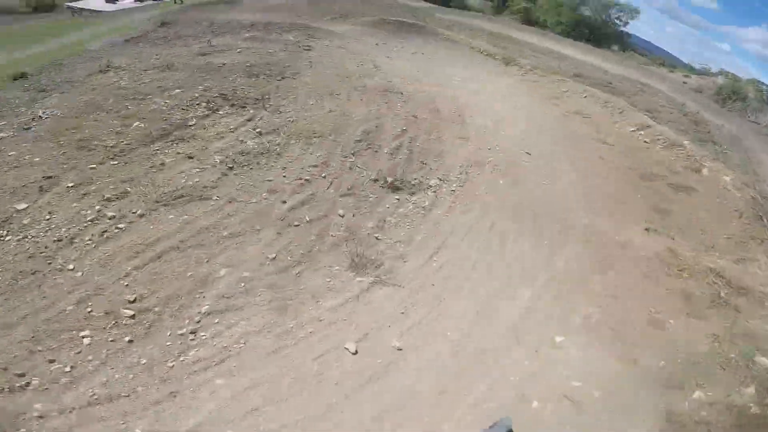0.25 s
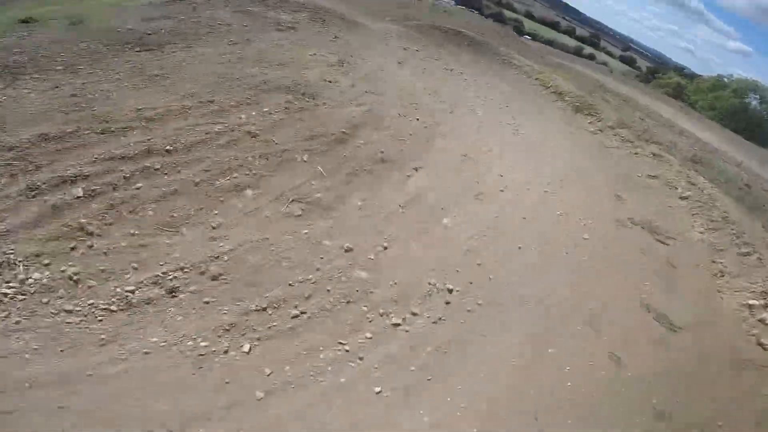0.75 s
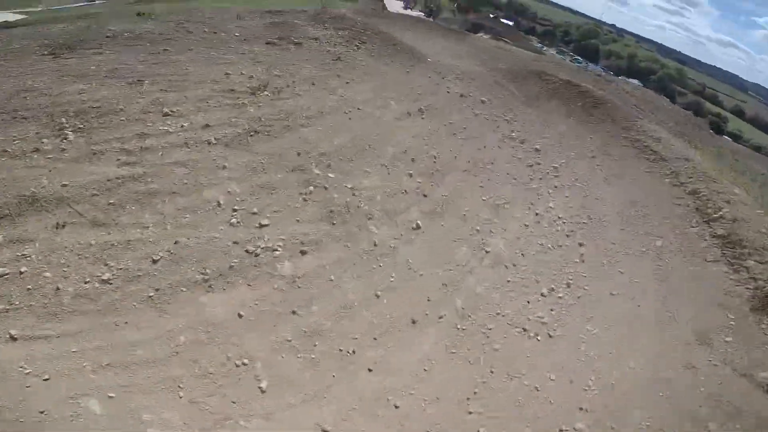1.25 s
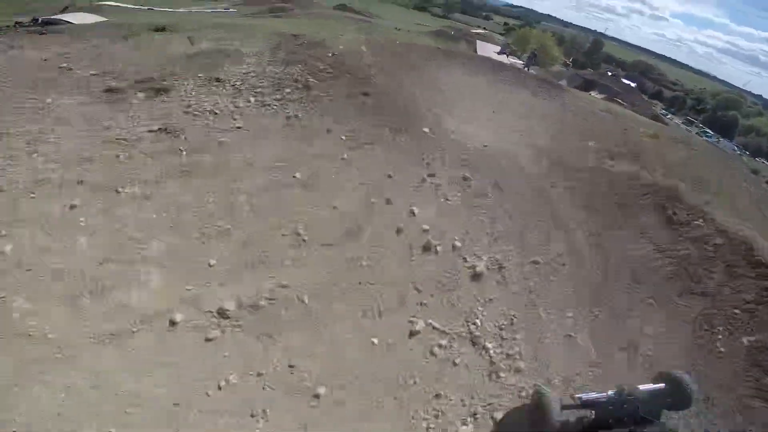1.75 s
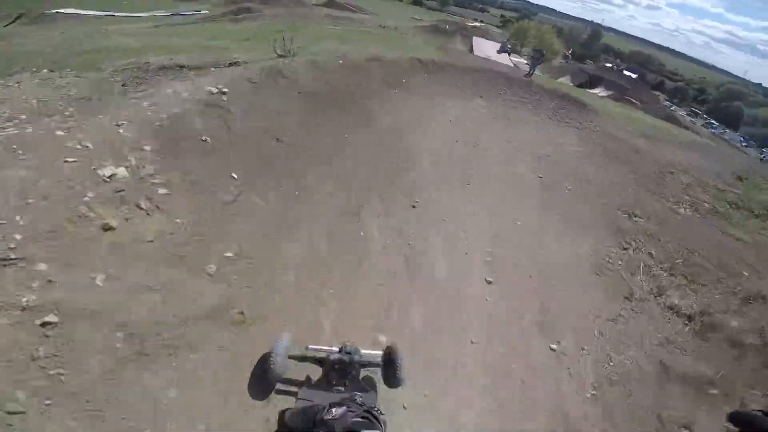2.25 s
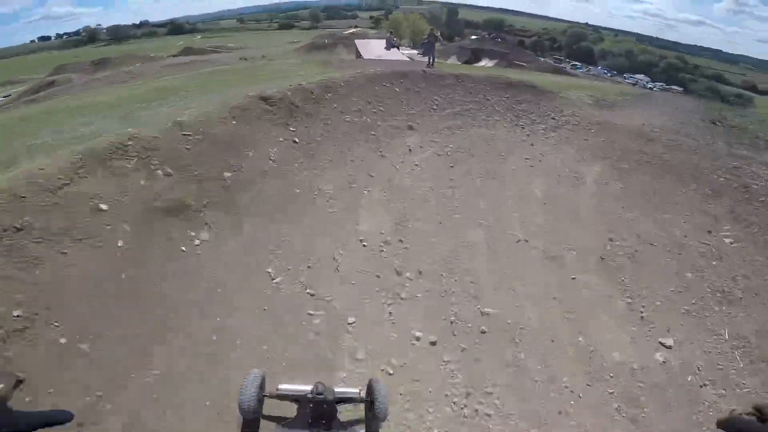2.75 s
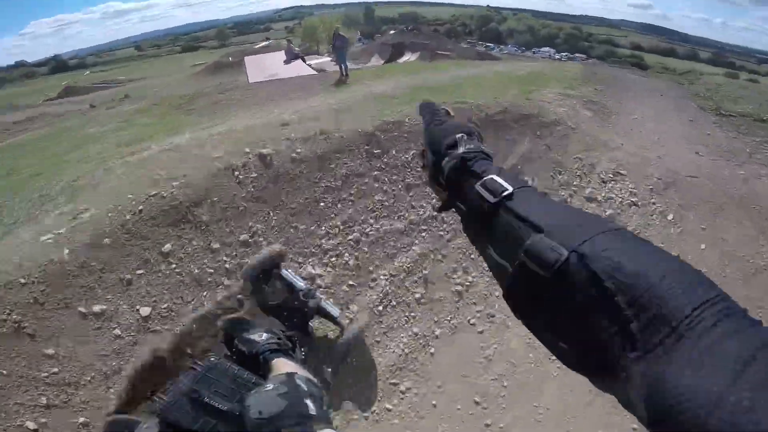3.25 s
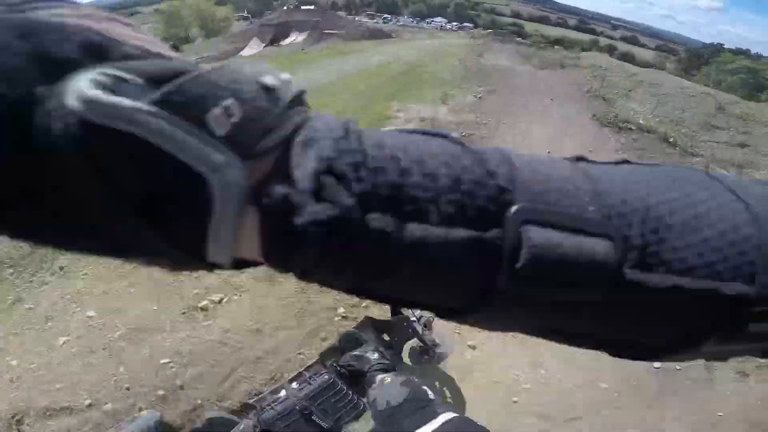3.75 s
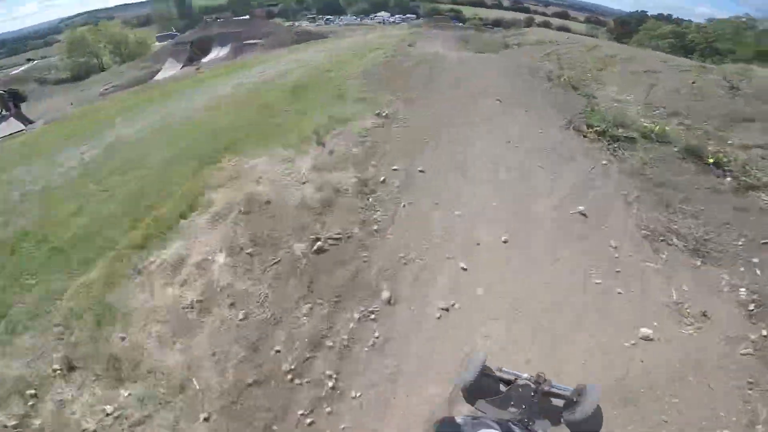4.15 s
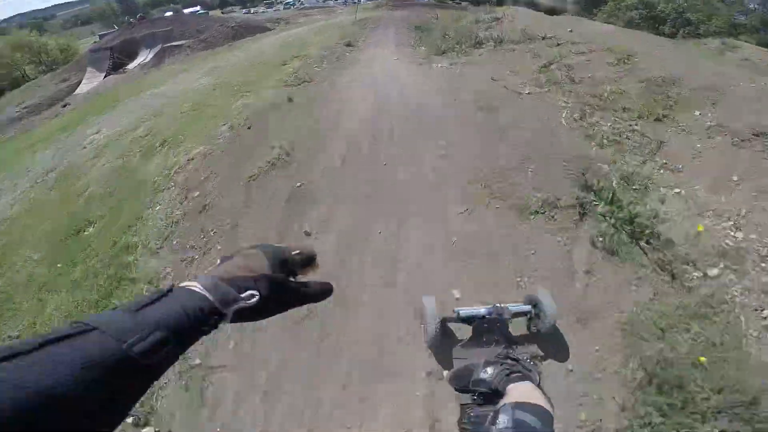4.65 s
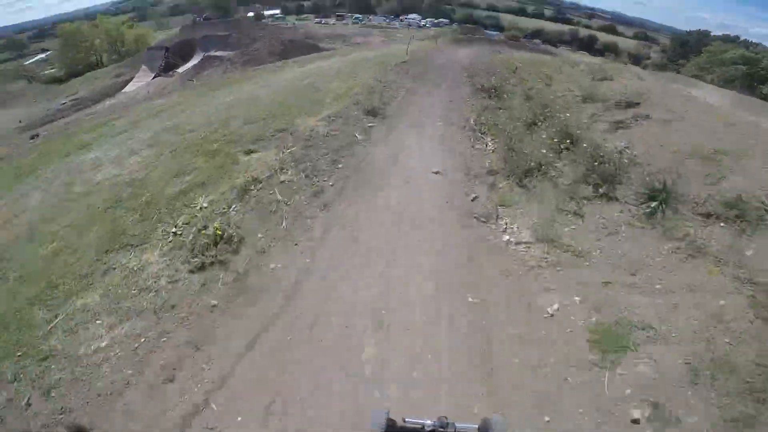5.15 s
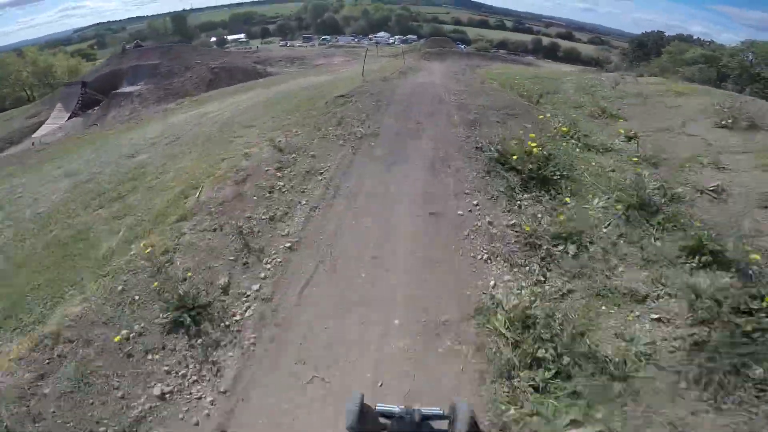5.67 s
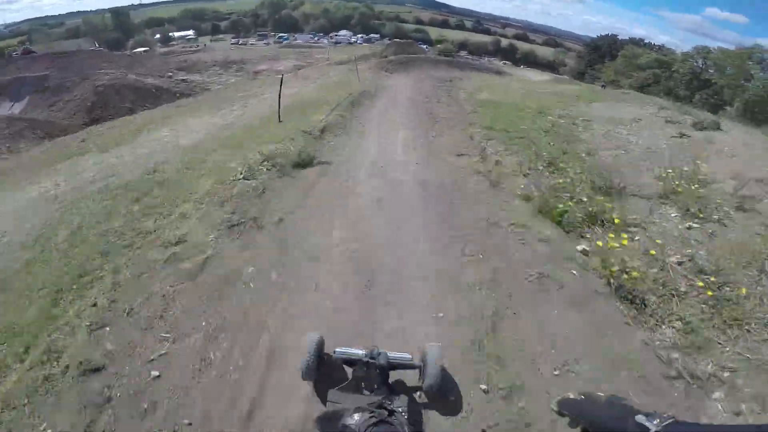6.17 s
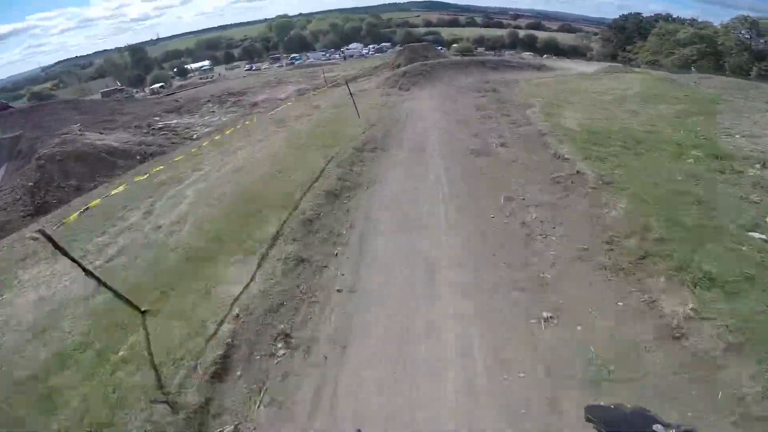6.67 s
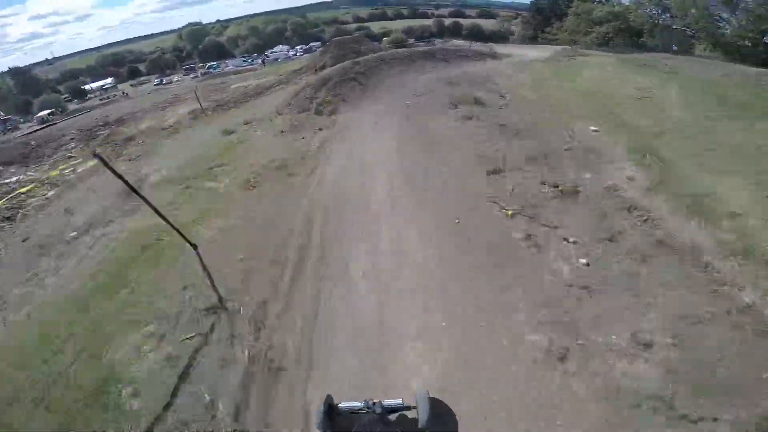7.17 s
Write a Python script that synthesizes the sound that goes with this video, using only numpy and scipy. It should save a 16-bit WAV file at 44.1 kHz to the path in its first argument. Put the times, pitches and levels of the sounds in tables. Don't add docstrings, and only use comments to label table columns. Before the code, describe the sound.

From the start, deep wind buffeting flutters against a cased microphone on a rider's helmet, coming in gusts a fraction of a second long throughout. Beneath it, small tyres roar over dirt and gravel, gritty, hissing and boxy, the tone shifting as the head turns. Stones click at about 0.1, 0.7, 1.5 and 2.1-2.3 seconds, with modest mount knocks near 0.8, 1.7, 2.3 and 2.8. At 3.3 the ride gets rough: a hard double thump and rattle, crunching gravel, then more heavy knocks at 3.8-3.9, 4.2 and 4.5. A strap rubs in two short drags around 4.0-4.15, and a sharp stone clicks amid it. After a last clear knock near 5.1, the board rolls on with fainter ticks, a dusty swell around 5.9-6.2, a brief lightening near 6.6, and rumbling wind to the end at about 7.4.

```python
import sys
import numpy as np
from scipy import signal
from scipy.fft import next_fast_len
from scipy.io import wavfile
from scipy.ndimage import uniform_filter1d

SR = 44100
rng = np.random.default_rng(int(sys.argv[2]) if len(sys.argv) > 2 else 0)


def output_pcm(signal):
    pcm = np.clip(np.atleast_2d(signal).T, -1, 1) * 32767
    wavfile.write(sys.argv[1], SR, np.round(pcm).astype(np.int16))


def rack_gain(trim_db):
    fader = np.asarray(trim_db, float)
    return 10 ** (fader / 20)


N = 326781
TIME = np.arange(N) / SR


def rms_one(x):
    return x / np.sqrt(np.mean(x ** 2) + 1e-20)


def in_time(rows):
    seconds, *columns = np.transpose(rows)
    return [np.interp(TIME, seconds, column) for column in columns]


def at_hz(points, hz):
    point_hz, db = np.transpose(points)
    return np.interp(np.log(hz), np.log(point_hz), db)


def hump(start, length):
    return np.sin(np.pi * np.clip((TIME - start) / length, 0, 1))


def drift(rate_hz):
    every, settle = 40, 2000
    pole = np.exp(-2 * np.pi * rate_hz * every / SR)
    noise = rng.standard_normal(N // every + settle + 2)
    slow = signal.lfilter([1], [1, -2 * pole, pole * pole], noise)[settle:]
    return np.interp(np.arange(N) / every, np.arange(len(slow)), rms_one(slow))


def band(x, low_hz, high_hz, order=2):
    sos = signal.butter(order, [low_hz, high_hz], "band", fs=SR, output="sos")
    return signal.sosfilt(sos, x + 1e-18)


def ring(clicks, hz, t60):
    pole = rack_gain(-60 / (t60 * SR))
    turn = 2 * np.pi * hz / SR
    return signal.lfilter([0, np.sin(turn)], [1, -2 * pole * np.cos(turn), pole * pole], clicks + 1e-18)


def evened(x, share, seconds):
    envelope = np.abs(signal.hilbert(x, next_fast_len(N))[:N])
    level = uniform_filter1d(envelope, int(seconds * SR))
    return rms_one(x / (level + 1e-3) ** np.clip(share, 0, 1))


def bank(source, spectrum, edges, gain_db, patchy_db):
    out = 0
    for k, (low, high) in enumerate(zip(edges, edges[1:])):
        hz = np.sqrt(low * high)
        flicker_db = patchy_db * (drift(24.0) + 1.2 * drift(1.0))
        level_db = at_hz(spectrum, hz) + gain_db(hz) + flicker_db
        out = out + rack_gain(level_db) * band(source[k % 2], low, high)
    return out


# time in seconds, rolling load in dB, softness in dB, dustiness in dB.
TRACK = [(0.0, -41, 1.5, -53.5), (0.82, -40, -7, -53.5), (1.48, -39.5, 0.5, -63), (2.0, -39.5, 1, -64),
         (2.31, -43, 0, -60.5), (3.03, -38, -2, -61), (3.2, -39.5, 0, -58.5), (3.42, -43.5, 1.5, -63),
         (3.73, -44.5, -1, -58.5), (3.98, -39, 0, -55.5), (4.27, -41.5, -3, -61),
         (4.58, -37.5, -3.5, -58.5), (4.93, -42.5, 0.5, -63), (5.51, -38.5, 2, -61.5),
         (5.86, -36.5, 2.5, -53), (6.19, -40, 5, -54), (6.4, -39, 4, -61.5), (7.41, -40, 0, -59.5)]
# middle in seconds, length in seconds, change in dB, frequency in Hz where it is felt most.
PATCHES = [(0.02, 0.042, 4, 8000), (0.397, 0.059, 5.5, 5000), (0.757, 0.056, 7, 4990),
           (0.837, 0.067, 3.5, 3920), (1.285, 0.082, 5, 1300), (1.457, 0.04, 9, 6880),
           (1.565, 0.068, 5.5, 3280), (1.592, 0.049, -4.5, 1510), (2.026, 0.035, 4, 2490),
           (2.089, 0.085, 5.5, 2470), (2.256, 0.067, 5, 8000), (2.335, 0.19, -5.5, 3158),
           (2.757, .08, 4, 5990), (3.023, 0.12, 8, 9120), (3.292, 0.3, 6.5, 7895), (3.398, 0.052, 8, 5996),
           (3.578, 0.12, -6.5, 6820), (3.784, 0.12, 4.5, 5040), (3.856, 0.076, 11, 7150),
           (4.006, 0.073, 11, 7900), (4.05, 0.057, -10, 1515), (4.157, 0.028, 7.5, 6000),
           (4.246, 0.066, -3, 1500), (4.601, 0.049, 7.5, 2000), (4.752, 0.091, 4.5, 4010),
           (4.961, 0.064, -4, 4000), (5.159, 0.034, 10, 5000), (5.674, 0.12, 4, 8090),
           (6.29, 0.054, -6, 2480), (6.609, 0.079, -7, 5940)]
# frequency in Hz, level in dB per Hz.
ROAR_SPECTRUM = [(220, -1), (400, -5), (1000, -14), (2500, -18), (5000, -20.5), (8000, -31.5), (15000, -33)]
FOLLOW_LOAD = [.8, 1.3, 1.1, 0.19, .01]
FOLLOW_SOFT = [1.01, .5, -.2, .01, .01]
FOLLOW_DUST = [.01, .01, 0.17, 0.55, 0.8]


def tyres():
    load, soft, dust = [curve - curve.mean() for curve in in_time(TRACK)]
    centres = np.log([480, 1300, 3200, 7300, 12800])
    surge, lumps = drift(22), drift(136)
    every = 40
    humps = np.array([db * hump(s - long / 2, long)[::every] ** 2 for s, long, db, _ in PATCHES])
    felt_hz, reach_octaves = np.array(PATCHES)[:, 3], 1.3

    def gain_db(hz):
        def share(weights):
            return np.interp(np.log(hz), centres, weights)

        ground = share(FOLLOW_LOAD) * load + share(FOLLOW_SOFT) * soft + share(FOLLOW_DUST) * dust
        reach = np.exp(-(np.log2(hz / felt_hz) / reach_octaves) ** 2)
        patches = np.interp(TIME, TIME[::every], reach @ humps)
        lively = share([0.77, 0.35, 0.49, 0.56, 0.75])
        return ground + patches + lively * (surge + 3.1 * lumps)

    sizes = rack_gain(7.8 * np.minimum(rng.exponential(1, N), 5)) * rng.choice([-1, 1], N)
    grains_per_s = 900 * rack_gain(3 * surge)
    grains = rms_one(sizes * (rng.random(N) < grains_per_s / SR))
    source = rng.standard_normal((2, N)) + 0.4 * grains
    edges = np.geomspace(230, 16500, 19)
    return rack_gain(-41.0) * rms_one(bank(source, ROAR_SPECTRUM, edges, gain_db, patchy_db=0.84))


# time in seconds, peak in dB, dull share in dB, bright share in dB.
STONES = [(0.1286, -29, -12, -12), (0.384, -31, -13, -17), (0.7415, -26, -17, -14), (1.453, -22, -15, -14),
          (2.0725, -28, -5, -31), (2.2134, -27, -7, -16), (2.2726, -31, -3, -17), (2.3448, -29.5, -13, -19),
          (3.2669, -34.5, 5, 3), (3.2849, -26.5, 3, 0), (3.4051, -32, -1, -9), (3.5808, -34, -7, -20),
          (3.848, -34, -13, -12), (3.99, -31, -16, -14), (4.0715, -21.5, -13, -22), (4.5981, -28, 14, -20),
          (4.779, -39, -18, -20), (4.898, -24, -13, -27), (5.1617, -43, -18, -18), (5.5368, -32, -11, -12),
          (5.967, -39, -1, -13), (6.4196, -41, -6, -15)]


def stones():
    length = 900
    out = np.zeros((3, N + 2000))
    decay = np.exp(-np.arange(length) / (0.0026 * SR))
    bursts = rng.standard_normal((len(STONES), length)) * decay
    bursts[:, 0] += 5.5
    for (s, db, dull_db, bright_db), burst in zip(STONES, bursts):
        at = round(s * SR)
        colours_db = np.array([[dull_db], [0], [bright_db]])
        out[:, at:at + length] += rack_gain(db + colours_db) * burst
    dull, middle, bright = out[:, :N]
    thud = rack_gain(-19.0) * ring(dull, hz=1770, t60=0.0066)
    thud = thud - rack_gain(-33) * ring(dull, hz=2470, t60=0.011)
    thud = thud + rack_gain(-32.5) * ring(dull, hz=1125, t60=0.024)
    return thud + rack_gain(0.5) * band(middle, 2600, 3300) + rack_gain(-5.5) * band(bright, 5600, 13000)


# start in seconds, end in seconds, frequency in
# Hz, width in Hz, level in dB.
TURNS = [(-.3, 1.8, 1130, 131, 4), (.3, 1.48, 470, 59.3, 5), (.5, 1.9, 1360, 90, 4),
         (0.598, 1.65, 7300, 600, 4), (0.1, 1.25, 12200, 2200, -2.5), (2.1, 3.8, 10300, 500, -9),
         (2.6, 4.2, 1641, 129, -1.5), (3.298, 4.33, 1112, 119.3, 5.5), (3.7, 4.4, 9100, 400, 5.5),
         (3.7, 4.3, 15130, 800, 8), (4.2, 5.04, 8200, 510, 5), (5.0, 5.87, 5630, 304.7, -8),
         (5.6, 6.3, 10300, 498, -10), (5.7, 6.3, 2000, 250.1, 0), (6.499, 8.6, 533, 69.3, 1)]


def turning(x):
    out = x.copy()
    for start, end, hz, width_hz, db in TURNS:
        a, b = max(int(start * SR), 0), min(int(end * SR), N)
        swell = np.sin(np.pi * (TIME[a:b] - start) / (end - start))
        favoured = band(x[a:b], hz - width_hz / 2, hz + width_hz / 2, order=1)
        out[a:b] += rack_gain(db) * swell * favoured
    return out


# frequency in Hz, width in Hz, gain in dB.
CASE = [(470, 146, 3.5), (778, 59, -1.5), (1027, 195, 9), (1645, 383, 7.5), (2000, 300, -5.5),
        (2363, 397, 13.5), (3254, 87, -9.5), (3548, 344, 9), (3862, 256, 11.5), (5060, 226, -11),
        (5460, 450, 6.5), (6700, 810, 3.5), (7300, 350, 4.5), (8060, 130, 1), (8240, 730, 0),
        (10300, 640, 3), (11100, 400, -6), (12220, 1300, 2.5), (13800, 700, 2)]


def case(x):
    sos = []
    for hz, width_hz, db in CASE:
        w, g = 2 * np.pi * hz / SR, rack_gain(db / 2)
        a = np.sin(w) * width_hz / hz / 2
        middle = -2 * np.cos(w)
        section = np.array([1 + a * g, middle, 1 - a * g, 1 + a / g, middle, 1 - a / g])
        sos.append(section / (1 + a / g))
    return signal.sosfilt(sos, x)


# time in seconds, peak in dB, deep share in dB, hard share in dB.
JOLTS = [(0.809, -25.5, -3, -11), (1.726, -21, -15, -9), (2.308, -19, -30, -34), (2.783, -24.5, -14, -9),
         (2.874, -25, -16, -12), (3.119, -28.5, -6, -21), (3.279, -9.5, 0, -4), (3.303, -14, 1.5, -11),
         (3.343, -16, -6, -12), (3.54, -26, -7, -21), (3.743, -31.5, 11, -14), (3.829, -15.5, -3, -17),
         (3.913, -11, -0.5, -29), (3.946, -41, -6, -15), (3.974, -35, -8, 4), (4.003, -26.5, -21, -4),
         (4.122, -18.5, 1, -25), (4.19, -10, -1, -18), (4.203, -23, 5, -2.5), (4.469, -11, -25, -25),
         (4.623, -42, 12, 6), (5.082, -16.5, -28, -29)]
# frequency in Hz, level in dB, t60 in seconds.
MOUNT = [
    [(64, 2.5, 0.11), (96.6, 7.5, 0.16)],
    [(147.4, 2, 0.07), (186.06, 0.5, 0.14), (213, -6, 0.076)],
    [(303, -4, 0.076), (400, 6.5, 0.019), (468, 8, 0.032), (600.6, 5, 0.027), (706, 1, 0.054),
     (900, -8, .014)],
]
CONTACT_HZ = [334, 330, 770]
LEAD_S = [.004, 0.0048, 0.00039]


def jolts():
    seconds, peak_db, deep_db, hard_db = np.transpose(JOLTS)
    at = np.round((seconds + 0.00211) * SR).astype(int)
    spread_db = iter(rng.normal(0, 1.1, (len(at), 11)).T)
    shares_db = [deep_db + 2.2, 0 * peak_db + 3.1, hard_db]
    out = np.zeros(N)
    for share_db, part, contact_hz, lead in zip(shares_db, MOUNT, CONTACT_HZ, LEAD_S):
        sound = np.zeros(N)
        is_hard = len(part) > 3
        for k, (hz, db, t60) in enumerate(part):
            clicks = np.zeros(N)
            clicks[at - round(lead * SR)] = rack_gain(peak_db + share_db + db + next(spread_db))
            sign = 1 if is_hard else (-1) ** k
            sound += sign * ring(clicks, hz, t60)
        out += signal.sosfilt(signal.butter(3, contact_hz, fs=SR, output="sos"), sound)
    return rack_gain(-1.5) * out


# time in seconds, level in dB.
RUB = [
    (3.9, -42),
    (4.0, -29.5),
    (4.038, -50),
    (4.12, -25.5),
    (4.17, -50),
]


def rub():
    slips = rng.standard_normal((6, N)) * (rng.random(N) < 420 / SR)
    hard_modes = MOUNT[2][1:]
    sound = sum(rack_gain(db) * ring(row, hz, t60) for row, (hz, db, t60) in zip(slips, hard_modes))
    dragging = (TIME > RUB[0][0]) & (TIME < RUB[-1][0])
    return rack_gain(in_time(RUB)[0] - 1.0) * dragging * evened(sound, share=0.7, seconds=0.018)


# start in seconds, length in seconds, top in dB, pumping rate in Hz.
GUSTS = [(-.1, 0.16, -16.5, 30), (0.076, 0.35, -18, 25.35), (0.419, 0.12, -14.5, 30.5),
         (0.488, 0.39, -12.5, 31.5), (0.836, 0.16, -13, 29.5), (0.98, 0.23, -20, 33.5),
         (1.192, 0.23, -12.5, 30.03), (1.484, 0.12, -13, 30.95), (1.619, 0.13, -15, 30),
         (1.738, 0.32, -13, 27.22), (1.982, 0.22, -10.5, 29), (2.199, 0.19, -15.5, 28.8),
         (2.445, 0.38, -15, 27.72), (2.819, 0.25, -11.5, 28.12), (3.112, 0.26, -10.5, 26.2),
         (3.334, 0.28, -18.5, 25.03), (3.572, 0.14, -12, 28.97), (3.744, 0.25, -13, 30.56),
         (4.02, 0.27, -17, 37.85), (4.42, 0.43, -14.5, 30.13), (4.899, .29, -13.5, 25.57),
         (5.16, 0.17, -15.5, 30.84), (5.423, 0.24, -19, 31.45), (5.621, .33, -10.5, 31.24),
         (5.926, 0.21, -20, 26.9), (6.1, 0.36, -18.5, 27.52), (6.452, 0.17, -16.5, 26.04),
         (6.608, 0.42, -15, 26.4), (6.957, 0.25, -17, 32.13), (7.345, 0.14, -15.5, 27.65)]
# time in seconds, level in dB.
AIRFLOW = [(0.0, -29.5), (0.33, -26.5), (0.56, -36), (1.15, -33), (1.51, -29), (1.92, -33), (2.19, -36),
           (2.83, -36.5), (3.63, -37), (4.02, -25), (4.33, -32), (4.66, -32.5), (5.53, -27), (5.92, -26),
           (6.31, -24), (7.02, -28.5), (7.22, -22), (7.41, -29.5)]
# frequency in Hz, level in dB per Hz.
RUMBLE = [
    (50, 4.5),
    (80, 4),
    (120, -2),
    (190, -3),
    (250, -30),
]


def wind():
    start, length, _, gust_hz = np.transpose(GUSTS)
    fullness = 0.96
    calm = rack_gain(-29)
    gusts = sum(rack_gain(db) * np.abs(hump(s, long)) ** fullness for s, long, db, _ in GUSTS)
    hz = np.interp(TIME, start + length / 2, gust_hz) * (1 + 0.1 * drift(8.17))
    noise = rng.standard_normal((3, N))
    pump = np.sqrt(2) * np.sin(2 * np.pi * np.cumsum(hz) / SR)
    buffet = pump + rack_gain(-6.5) * rms_one(band(noise[0], 14.6, 46.7))
    buffet = rack_gain(-0.45) * (calm + gusts) * evened(buffet, share=0.51, seconds=0.042)
    rumble = bank(noise[1:], RUMBLE, np.geomspace(45, 260, 7), lambda hz: 0, patchy_db=1.44)
    rumble = rack_gain(in_time(AIRFLOW)[0] + 0.9) * evened(rumble, share=0.16, seconds=0.11)
    return buffet + rumble


def scene():
    airborne = case(turning(tyres()) + stones())
    mix = airborne + wind() + jolts() + rub()
    return mix[None]


def band_limit(x):
    return signal.sosfilt(signal.butter(12, 15460, fs=SR, output="sos"), x)


def record(dry):
    rounded = 1.111 * np.tanh(dry / 1.131)
    top_cut = signal.cheby2(20, 60, 15480, fs=SR, output="sos")
    return band_limit(signal.sosfilt(top_cut, rounded))


dry = scene()
out = record(dry)
output_pcm(out)
```